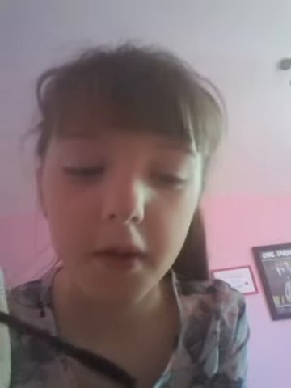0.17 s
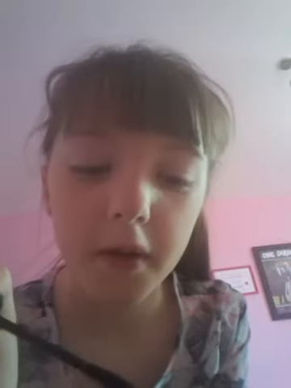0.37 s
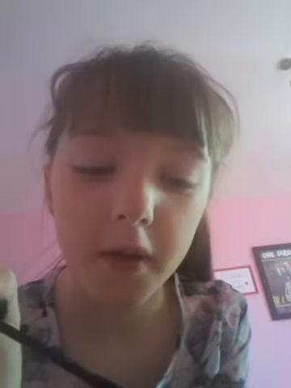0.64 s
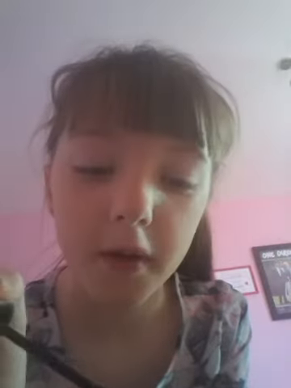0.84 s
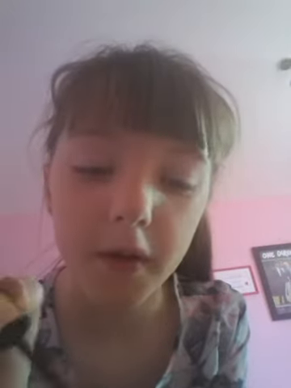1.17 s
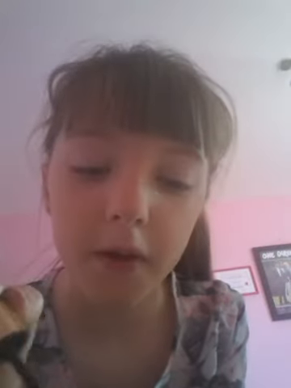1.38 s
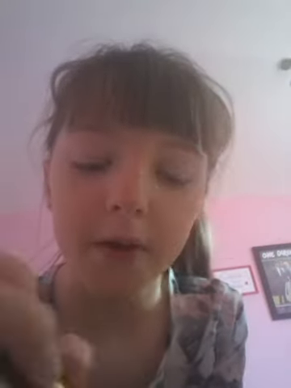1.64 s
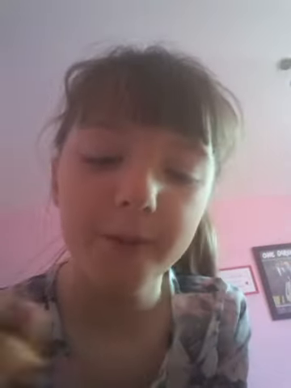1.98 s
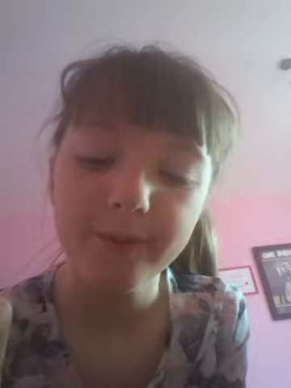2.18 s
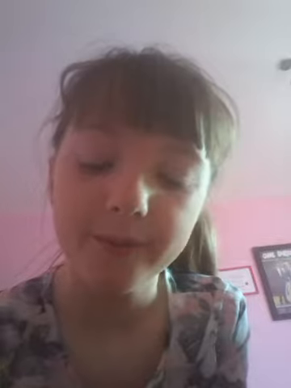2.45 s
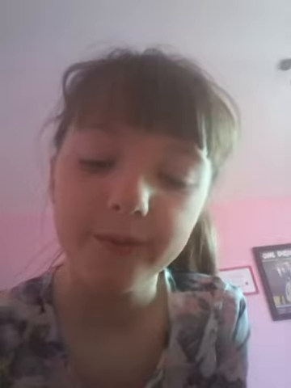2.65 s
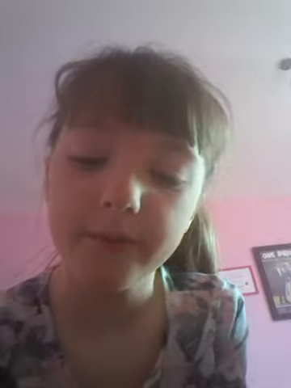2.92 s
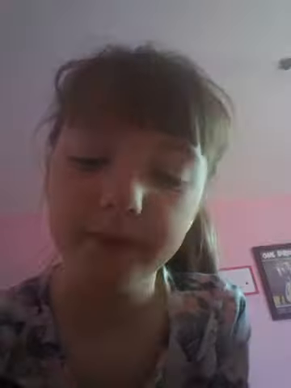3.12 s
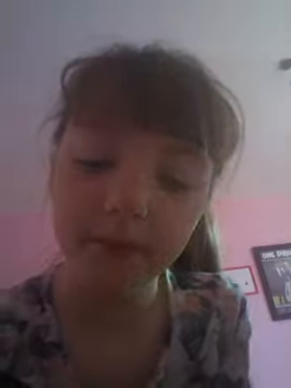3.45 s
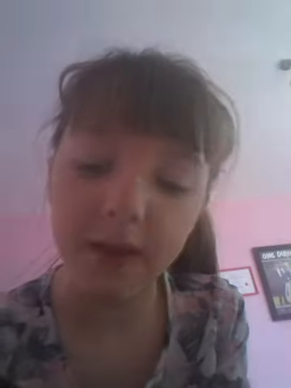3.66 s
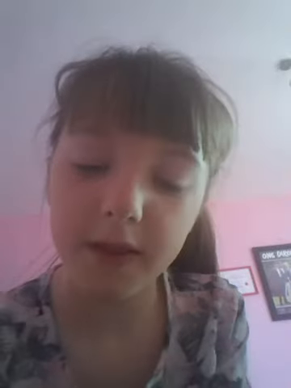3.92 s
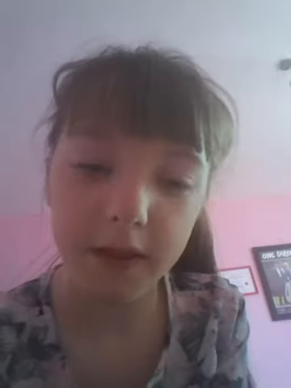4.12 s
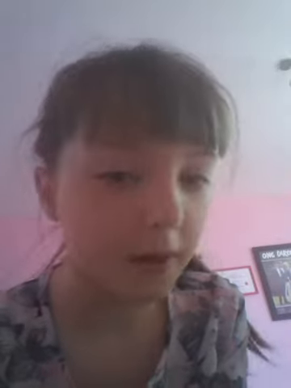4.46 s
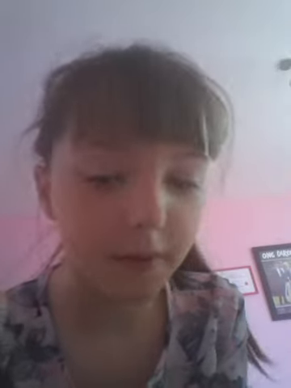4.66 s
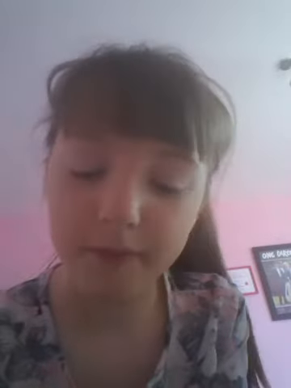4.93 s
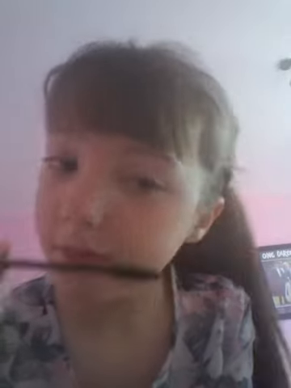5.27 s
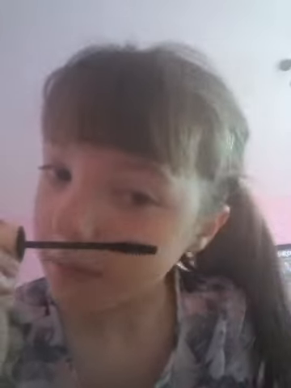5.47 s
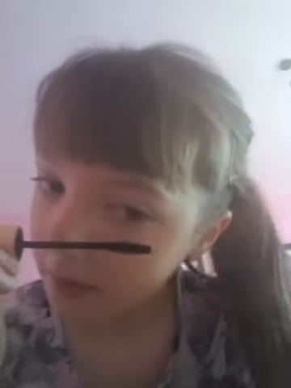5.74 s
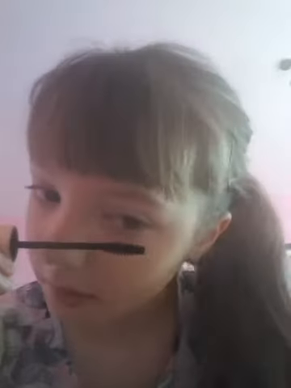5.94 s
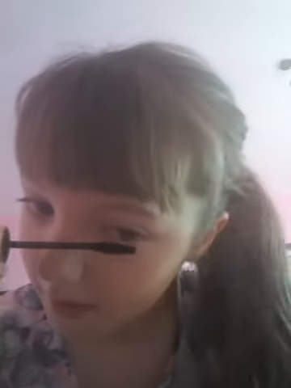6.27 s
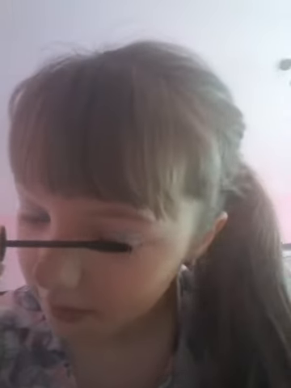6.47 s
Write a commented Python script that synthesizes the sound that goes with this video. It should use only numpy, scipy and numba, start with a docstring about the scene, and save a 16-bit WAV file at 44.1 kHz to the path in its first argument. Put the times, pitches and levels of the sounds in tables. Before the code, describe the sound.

Close plastic clicks and short bristle scrapes from a mascara tube, then a soft sleeve rustle and faint finger rubbing in a quiet bedroom.

```python
"""A mascara wand and its plastic tube, a hand's width from a small stereo microphone in a quiet bedroom.
At about 1 s the bristles scrape through the neck and the wand knocks, then snaps against the tube, just
overloading the microphone. More scrapes and ticks follow. Around 3 s a sleeve brushes past and the hands
bump softly; from 4.2 s the fingers work the wand to and fro. At 5.7 s the mouth opens with a small lip
smack. Underneath, low rumble and background hiss rise around the louder sounds and sink in the pauses."""
import sys
import numpy as np
from scipy import signal
from scipy.fft import rfft, irfft, next_fast_len
from scipy.io import wavfile
from scipy.ndimage import uniform_filter1d
from numba import njit

SR = 44100
rng = np.random.default_rng(int(sys.argv[2]) if len(sys.argv) > 2 else 0)


def digitize_waveform(pressure):
    """Quantize a signal to 16-bit integers and store it at the path in sys.argv[1].

    Rows of a 2-D input are taken as channels; values are limited to [-1, 1].
    """
    field = np.atleast_2d(pressure).T
    bounded = np.clip(field, -1, 1)
    quanta = np.round(bounded * 32767).astype(np.int16)
    wavfile.write(sys.argv[1], SR, quanta)


N = 290619
TIME = np.arange(N) / SR

# ticks of plastic on plastic; the last two rows (5.738 and 5.739 s) are a small lip smack:
# t/s, level/dB, ring f/Hz, t60/s, shared modes re ring/dB, left minus right/dB
TICKS_AND_SMACK = [ (0.8770, -61, 6500, .012, -6, -1), (1.1107, -27.5, 601.4, 0.0062, -7, -6),
                   (1.2580, -51, 6600, 0.0046, -5, 3), (1.2747, -40, 2720, 0.0055, 14, 5),
                   (1.278, -35.5, 2820, 0.0056, 5, 2), (1.3106, -16, 1894, .005, -8, -1),
                   (1.3114, -4, 5650, 0.0052, 3, -1.5), (1.6750, -52, 5170, 0.0042, 5.5, 4.5),
                   (1.9742, -48, 2250, 0.0056, -2, 0.5), (2.0152, -40.5, 6370, 0.0055, -7.5, 12),
                   (2.0226, -36.5, 5900, 0.0044, 0, 4), (2.0400, -45.5, 4520, 0.0045, 0, -2),
                   (2.1514, -52.5, 530, 0.019, -5, -15), (2.327, -36, 1230, 0.004, 2.5, -11.5),
                   (2.7800, -57, 482, 0.033, -8, -3), (3.2915, -44, 7900, 0.0059, -5, 8),
                   (3.3600, -52, 7900, .010, -14, 8), (3.3880, -57, 3170, 0.027, 8, 10),
                   (3.7635, -61, 2860, 0.014, -5, -2.5), (4.2061, -50, 6800, 0.029, 6.5, 4.5),
                   (4.2270, -51.5, 6870, .018, -7, 8), (5.1519, -31, 4560, 0.0031, -8, -4),
                   (5.739, -48, 2150, 0.011, 6, 2), (5.7383, -56.5, 5420, 0.0094, -16.5, -1)]
# modes of the tube: f/Hz, level/dB, t60/s, left minus right/dB, lead of the left port/rad
TUBE_MODES = [(870, -19.5, 0.0074, -3.5, 2), (2160, -11, 0.0058, -6, 3), (2810, -7, 0.0052, -7, 1.4),
              (3670, -4.5, 0.0025, -10.5, 1.5), (4360, -7, 0.0024, -8, 0.88), (5940, -10.5, 0.0074, 4, 1.2),
              (6680, -8.5, 0.0061, 3.5, 2.22), (11360, -8, 0.0032, -4.5, 3.5),
              (14500, -15.5, .003, 5.5, 2.8)]
# bristles dragged through the neck: start t/s, crest t/s, end t/s, crest level/dB, swell/dB,
# squeak start f/Hz, squeak end f/Hz, squeak width/Hz, rasp re squeak/dB, left minus right/dB
BRISTLE_DRAGS = [ (1.003, 1.026, 1.060, -71, 22, 5794, 5810, 3000, -11, 1),
                 (1.056, 1.109, 1.117, -50, 24.5, 5470, 6160, 3960, 2, 4),
                 (1.253, 1.260, 1.345, -46.5, 13, 6800, 4900, 4050, -1.5, -2),
                 (1.581, 1.668, 1.760, -72, 8.5, 2600, 3000, 4020, -3, 0.5),
                 (1.978, 1.995, 2.036, -52, 10.5, 7070, 6220, 1594, -6, 2),
                 (1.994, 2.026, 2.075, -58.5, 6.5, 5740, 5020, 5030, 0.5, 1.5),
                 (2.165, 2.33, 2.350, -55, 28.5, 4880, 4620, 4600, -1, 5),
                 (2.319, 2.333, 2.342, -49, 10, 6030, 6860, 4000, 3, 5),
                 (2.335, 2.339, 2.347, -43, 6, 6330, 7130, 3520, -8, -4)]
# strokes of the wand between the fingers: crest t/s, relative level/dB, length/s, pitch ratio
TWIST_STROKES = [(4.24, -63, .1, 0.98), (4.391, -67, 0.073, .98), (4.498, -62, 0.047, 1.03),
                 (4.614, -65.5, 0.13, 0.96), (4.737, -66, 0.076, 1.02), (4.810, -67, 0.11, 0.97),
                 (4.957, -62, .05, 1.01), (5.073, -63.5, 0.071, 0.96), (5.187, -60, 0.078, 1.01),
                 (5.321, -61, 0.061, 1.01), (5.422, -66, 0.052, 1.08), (5.562, -64, 0.079, 1.01)]
# resonances of the rubbed plastic: f/Hz, width/Hz, relative level/dB
RUB_MODES = [(3340, 470, 1.5), (5370, 1200, -2)]
# low thuds, of the wand knocking the tube's neck at 1.109 s and otherwise of the hands:
# t/s, level/dB, f/Hz, t60/s
THUDS = [(0.845, -73, 97, .09), (0.992, -60, 137, .07), (1.109, -32, 330, .025), (2.784, -54, 150, 0.078),
         (3.026, -55, 180, .1), (3.186, -53, 200, 0.077), (3.484, -55.5, 195, 0.075),
         (4.195, -65, 102, 0.091), (5.175, -58.5, 110.3, .12), (5.560, -51, 170.5, 0.065),
         (5.724, -52.5, 139.5, .1)]
# swells: start t/s, hold/s, relative level/dB
SLEEVE_PASSES = [(0.6, .28, -79), (2.765, 0.22, -72.5), (3.165, .36, -62), (3.245, 0.11, -61.5),
                 (3.745, 0.043, -69.5)]  # cloth brushing past as the arm moves
BACKGROUND_RISES = [(0.98, 0.52, -61.5), (1.63, 0.029, -61.5), (1.96, 0.45, -64), (2.76, 0.043, -65),
                    (2.96, 0.083, -67.5), (3.16, 0.45, -63.5), (3.74, 0.061, -68), (4.02, .28, -66.5),
                    (4.49, .93, -69.5), (5.54, 0.054, -64), (5.715, 0.16, -62.5), (6.05, 0.18, -70.5)]  # rumble and hiss coming up around the louder sounds
# spectra: f/Hz, relative level/dB
RASP_SPECTRUM = [(60, -16), (300, -2), (1200, -1.5), (2800, 1.5), (4500, -0.5), (8000, -6), (10500, -14),
                 (14000, -14.5)]  # bristles on the rim
SLEEVE_SPECTRUM = [(60, -15), (180, 17.5), (450, 7.5), (1200, -0.5), (2000, -4), (3000, -2.5), (4500, -9.5),
                   (5600, 0.5), (6200, 5.5), (7000, -2), (14000, -8.5)]  # rubbing cloth
WALL_SPECTRUM = [(100, -0.5), (1000, 2), (2000, 3.5), (2800, -2), (4000, 0.5), (4900, 1), (5600, -5.5),
                 (6400, 0), (8500, 3.5), (11000, 2), (14000, -6.5)]  # what the walls give back
BASS_SPECTRUM = [(15, -13), (40, -1.5), (70, 0), (110, -4.5), (200, -17), (600, -35), (4000, -60)]  # steady low background
RUMBLE_SPECTRUM = [(20, -16.5), (50, -3), (90, 0), (150, 0), (250, -7.5), (500, -12.5), (1000, -20),
                   (2500, -31), (8000, -53)]  # dull rumble
HISS_SPECTRUM = [(30, 5.5), (90, 17.5), (250, 12.5), (600, 5.5), (1500, 3.5), (3500, 2.5), (6000, 4.5),
                 (8500, 1), (14500, -1.5)]  # smooth background hiss
# surfaces near the microphone: delay/s, left gain, right gain
NEAR_SURFACES = [(.0018, 0.15, .16), (0.009, .05, 0.045), (0.0119, .035, .035)]
# response of the two microphone ports: f/Hz, left level/dB, right level/dB
PORT_RESPONSE = [(101.43, -11.5, -6.5), (2090, 5.5, 4.5), (4000, 7.5, 5.5), (5508, 9, 12), (6440, 12, -2),
                 (7388, 3, -4.5), (9000, 0.5, -7.5), (10200, -3.5, 0), (14500, -3.5, -4.5)]


def clicks(low_lead_rad=.9, high_lead_rad=.2):
    """Each plastic tick rings at its own spot and shakes the tube; the lip smack borrows those modes."""
    out = np.zeros((2, N))
    tube = sum(undb(db) * pan(side_db) * ring(hz, t60, lead)
               for hz, db, t60, side_db, lead in TUBE_MODES)
    for s, db, hz, t60, modes_db, side_db in TICKS_AND_SMACK:
        # low knocks reach the two ports further out of step
        spot = ring(hz, t60, np.interp(hz, [700, 5000], [low_lead_rad, high_lead_rad]))
        add(out, s, undb(db) * pan(side_db) * (spot + undb(modes_db) * tube))
    return out


def scrapes(release_db=17):
    """Bristles flick past the rim as the push grows; the squeak glides with the depth of the brush."""
    out = np.zeros((2, N))
    for start, crest, end, db, swell_db, hz0, hz1, width, rasp_db, side_db in BRISTLE_DRAGS:
        t = np.arange(start, end, 1 / SR)
        slips = friction(len(t), per_s=3500, spread_db=1.0, shared=0.61)
        glide_hz = np.linspace(hz0, hz1, len(t))
        band = bandpass(slips, glide_hz, float(width))
        squeak = unit(bandpass(band, glide_hz, float(width)))
        rasp = unit(colour(slips, RASP_SPECTRUM))
        push = undb(db + np.interp(t, [start, crest, end], [-swell_db, 0, -release_db]))
        add(out, start, push * pan(side_db) * (squeak + undb(rasp_db) * rasp))
    return out


def twisting(level_db=-6, side_db=3.5):
    """Finger friction sounds through two broad resonances of the plastic, which shift with each grip."""
    slips = friction(N, per_s=4000, spread_db=1.5, shared=0.27)
    crests, _, _, ratios = np.transpose(TWIST_STROKES)
    pitch = np.interp(TIME, crests, ratios)
    body = sum(undb(db) * bandpass(slips, hz * pitch, float(width)) for hz, width, db in RUB_MODES)
    return unit(body) * stroke_gain() * undb(level_db) * pan(side_db)


def thuds():
    """The wand's knock on the tube's neck and the bumps of the hands: one low mode each, soft in onset."""
    out = np.zeros((2, N))
    for s, db, hz, t60 in THUDS:
        add(out, s, undb(db) * ring(hz, t60, lead_rad=2.1, contact_s=.005))
    return out


def sleeve(level_db=-1, side_db=1):
    """Cloth fibres slip densely: a soft, wide rustle."""
    fibres = friction(N, per_s=6000, spread_db=1.0, shared=0.3)
    passes = swells(SLEEVE_PASSES, attack_s=0.026, release_s=0.064)
    return unit(colour(fibres, SLEEVE_SPECTRUM)) * passes * undb(level_db) * pan(side_db)


def bedroom(x, t60_s=0.28, tail_db=-18, build_s=0.0073):
    """Close direct sound, a few near reflections, then a short diffuse tail from the furnished room."""
    t = TIME[:SR // 2]
    envelope = np.exp(-np.log(1000) * t / t60_s) * (1 - np.exp(-t / build_s))
    tail = rng.standard_normal((2, len(t))) * envelope
    response = undb(tail_db) * colour(unit(tail), WALL_SPECTRUM) / np.sqrt(len(t))
    response[:, 0] += 1  # direct path
    for delay, left, right in NEAR_SURFACES:
        response[:, int(delay * SR)] += left, right
    return signal.fftconvolve(x, response, axes=1)[:, :N]


def microphone(air):
    """Each port colours its side with its own treble resonance."""
    ports = np.array(PORT_RESPONSE)
    return np.array([colour(air[0], ports[:, [0, 1]]), colour(air[1], ports[:, [0, 2]])])


def background(bass_db=-74, rest_rumble_db=-75, rest_hiss_db=-68, opposed=0.9):
    """Steady bass, with rumble and hiss timed to rise around the louder sounds and sink in the pauses."""
    rises = swells(BACKGROUND_RISES, attack_s=0.018, release_s=0.13)
    lift = np.hypot(rises, undb(-4) * stroke_gain())
    rumble_gain = np.hypot(undb(rest_rumble_db), undb(1.5) * lift)
    hiss_gain = np.hypot(undb(rest_hiss_db), undb(1.0) * lift)
    lows = rng.standard_normal((2, 2, N))
    lows += opposed * rng.standard_normal((2, 1, N)) * np.array([[1], [-1]])  # antiphase in the ports
    bass = unit(colour(lows[0], BASS_SPECTRUM)) * undb(bass_db)
    rumble = unit(colour(lows[1], RUMBLE_SPECTRUM)) * rumble_gain
    hiss = unit(colour(rng.standard_normal((2, N)), HISS_SPECTRUM)) * hiss_gain
    return bass + rumble + hiss


def ring(hz, t60, lead_rad, contact_s=.00008):
    """One damped mode; the air follows its acceleration, which thins the bass."""
    t = TIME[:SR // 8]
    phase = 2 * np.pi * hz * t + lead_rad * np.array([[.5], [-.5]])
    swing = np.sin(phase) * np.exp(-np.log(1000) * t / t60)
    onset = 1 - np.exp(-t / contact_s)
    return np.diff(swing * onset, prepend=0) * SR / (2 * np.pi * hz)


def friction(count, per_s, spread_db, shared):
    """Tiny slips of uneven size; both ports hear the same slips, partly with the same waveform."""
    slipping = rng.random(count) < per_s / SR
    slips = slipping * undb(spread_db * np.minimum(rng.exponential(size=count), 4))
    envelope = np.sqrt(np.abs(uniform_filter1d(slips ** 2, size=16)))
    return unit(envelope * (rng.standard_normal((2, count)) + shared * rng.standard_normal(count)))


def stroke_gain(rise=0.32, fall=0.39):
    """Each twist speeds up to its crest and slows more gently; rise and fall are shares of its length."""
    power = 0
    for s, db, length, _ in TWIST_STROKES:
        from_crest = np.where(TIME < s, (s - TIME) / rise, (TIME - s) / fall) / length
        power += (undb(db) * np.exp(1 - np.hypot(1, from_crest))) ** 2
    return np.sqrt(power)


def swells(rows, attack_s, release_s):
    """Gain of overlapping swells: each rises, holds and dies away."""
    power = 0
    for start, hold, db in rows:
        age = TIME - start
        attack = np.clip(age / attack_s, 0, 1)
        release = np.exp(-np.maximum(age - attack_s - hold, 0) / release_s)
        power += (undb(db) * attack * release) ** 2
    return np.sqrt(power)


def colour(x, points):
    """Minimum-phase filter through points of f/Hz, level/dB."""
    hz, db = np.transpose(points)
    size = 2 * next_fast_len(x.shape[-1])
    bin_hz = np.arange(size // 2 + 1) * SR / size
    gain = undb(np.interp(np.log(bin_hz + 1), np.log(hz), db))
    cepstrum = irfft(np.log(gain))
    cepstrum[1:size // 2] *= 2  # fold onto positive time: causal
    cepstrum[size // 2 + 1:] = 0
    return irfft(rfft(x, size) * np.exp(rfft(cepstrum)))[..., :x.shape[-1]]


@njit
def bandpass(x, hz, width_hz):
    """State-variable band-pass with a moving centre, on both channels."""
    y = np.empty_like(x)
    for side in range(2):
        band_state, low_state = 0., 0.
        for i in range(x.shape[1]):
            tuning, damping = np.tan(np.pi * hz[i] / SR), width_hz / hz[i]
            band = (band_state + tuning * (x[side, i] - low_state)) / (1 + tuning * (tuning + damping))
            band_state = 2 * band - band_state
            low_state += 2 * tuning * band
            y[side, i] = damping * band
    return y


def undb(db):
    """Decibels to gain."""
    return 10 ** (np.asarray(db) / 20)


def unit(x):
    """Scale to rms 1."""
    return x / np.sqrt(np.mean(x ** 2))


def pan(db):
    """Left and right gains for a level difference."""
    return undb(np.array([[db], [-db]]) / 2)


def add(out, s, x):
    """Mix x into out from time s."""
    i = int(round(s * SR))
    out[:, i:i + x.shape[-1]] += x[..., :N - i]


def scene():
    """The close sounds pass through the bedroom and the microphone ports, over the background."""
    close = clicks() + thuds() + scrapes() + twisting() + sleeve()
    return microphone(bedroom(close)) + background()


def record(dry, top_hz=14700):
    """The recorder clips at full scale and cuts the top."""
    lowpass = signal.ellip(8, .2, 70, top_hz, fs=SR, output="sos")
    return signal.sosfilt(lowpass, np.clip(dry, -1, 1))


dry = scene()
out = record(dry)
digitize_waveform(out)
```